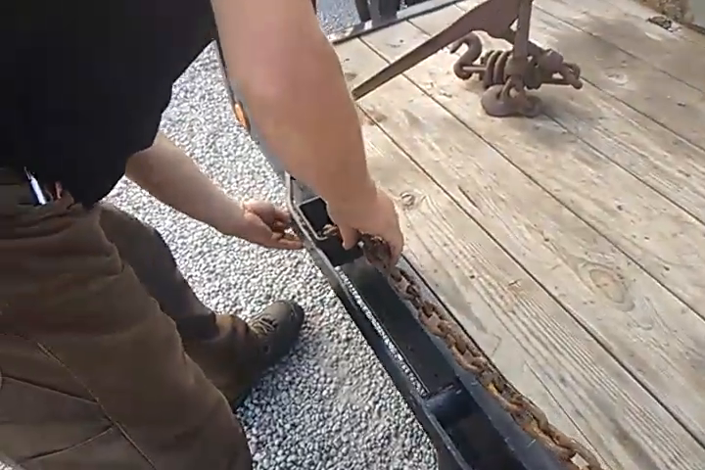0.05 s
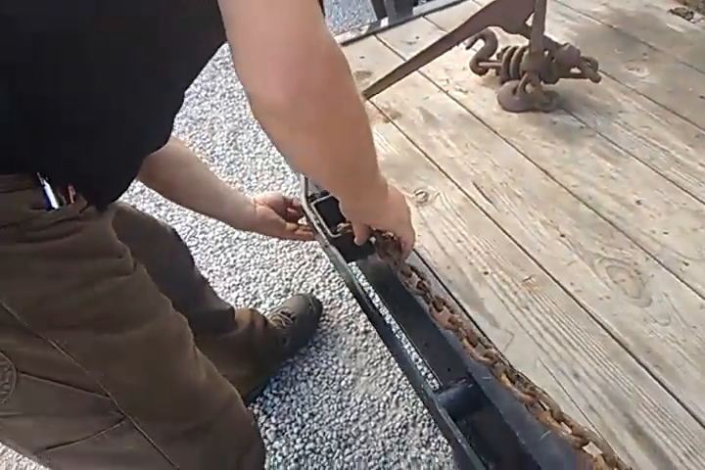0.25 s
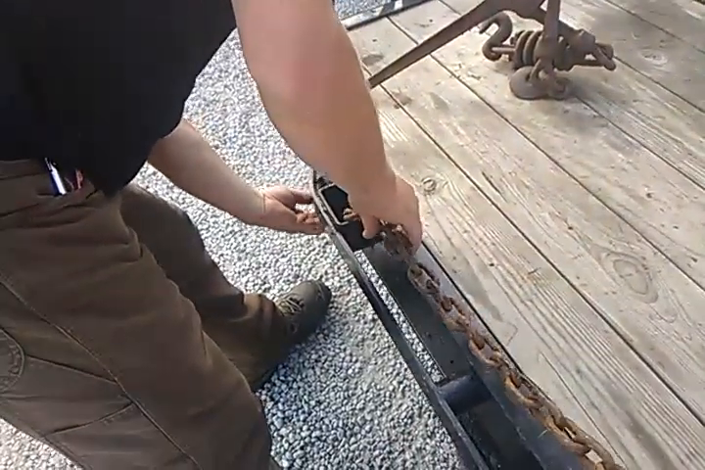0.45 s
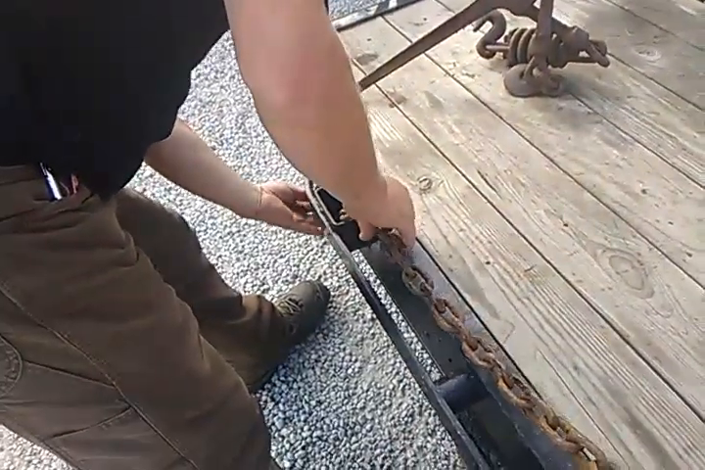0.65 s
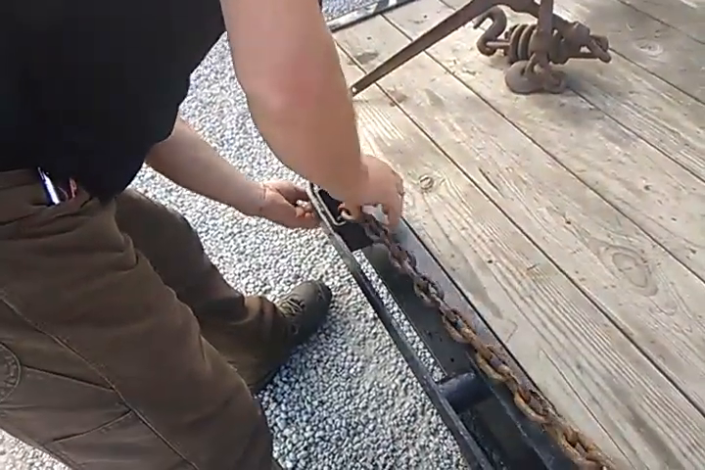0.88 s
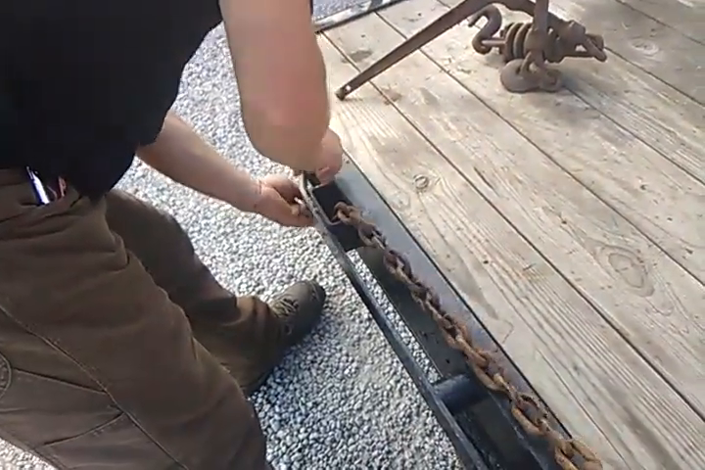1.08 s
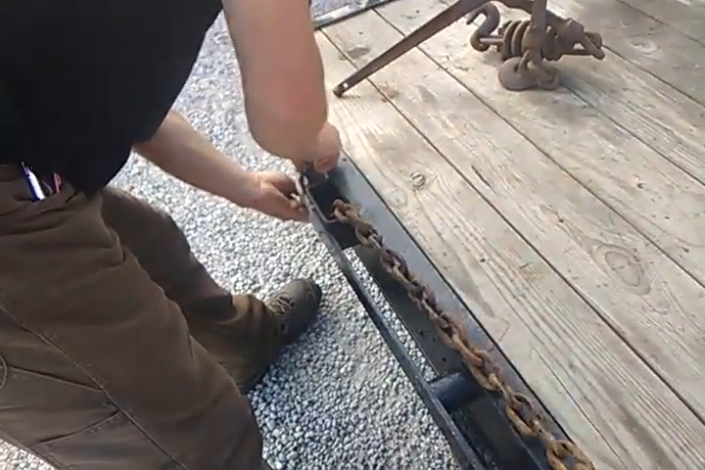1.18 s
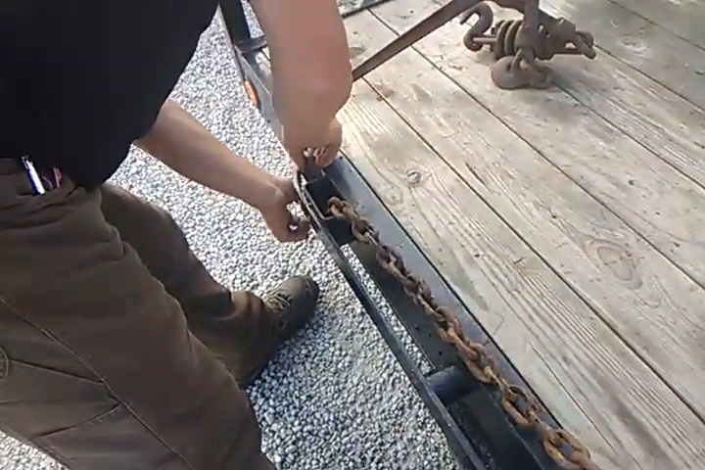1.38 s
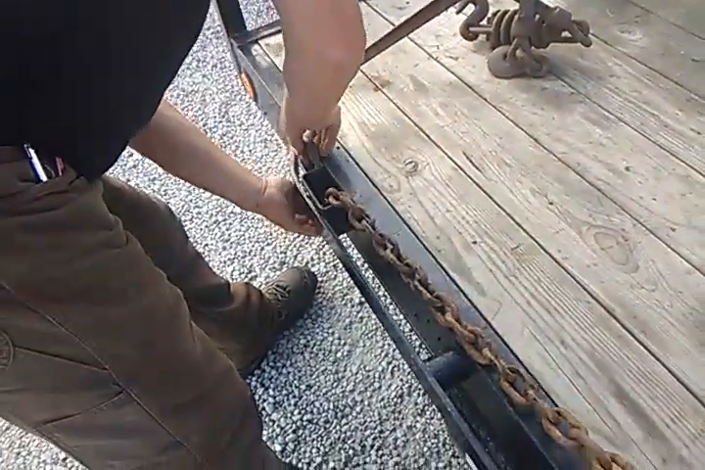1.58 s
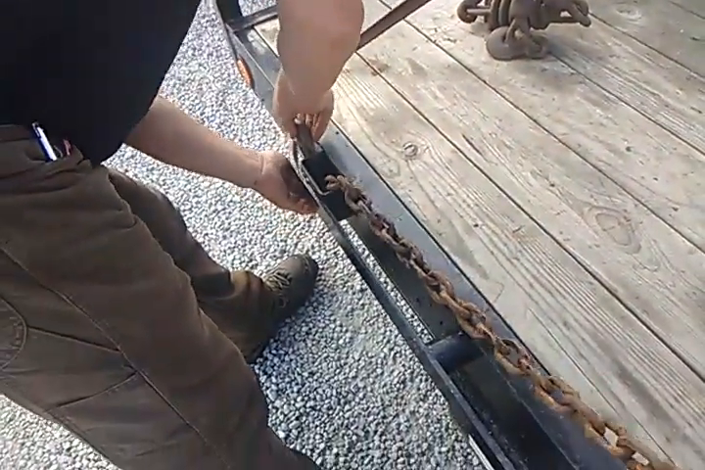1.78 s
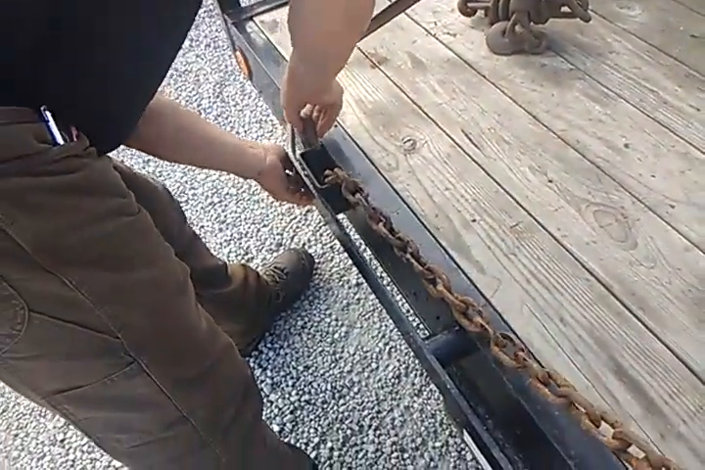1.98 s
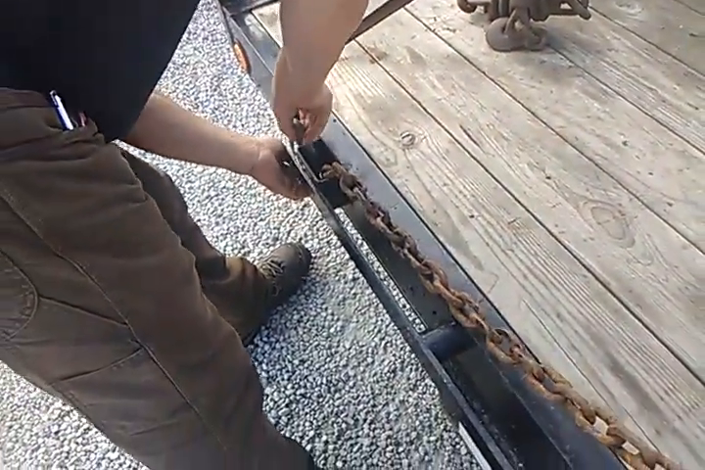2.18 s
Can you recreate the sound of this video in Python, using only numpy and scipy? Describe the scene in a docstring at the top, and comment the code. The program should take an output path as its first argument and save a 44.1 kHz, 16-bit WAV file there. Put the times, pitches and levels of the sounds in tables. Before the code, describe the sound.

A heavy steel chain rattles and clanks over a metal trailer rail outdoors, ringing brightly, then settling

```python
"""A heavy steel chain is hauled link by link over the rail of a trailer, outdoors, before two microphones.
Each blow is a run of contacts that shakes noise bands and modes of the rail, plus a clink and inharmonic partials.
Snaps are bright noise bursts, slipping links squeak as gliding sines, free links ring on in high modes.
The loose end then knocks a few times and the deck thuds in dull noise.
Behind it, low noise is wind on the microphones, a steady hiss is the air, and falling sines are a faint bird."""
import sys
import numpy as np
from scipy import signal
from scipy.fft import rfft, irfft
from scipy.io import wavfile

SR = 44100
rng = np.random.default_rng(int(sys.argv[2]) if len(sys.argv) > 2 else 0)


def store_pcm(level_fs):
    """Save levels as 16-bit WAV."""
    pcm = np.round(np.clip(level_fs, -1, 1) * 32767).astype(np.int16)
    wavfile.write(sys.argv[1], SR, np.atleast_2d(pcm).T)


N = 99225
T = np.arange(N) / SR
HZ = np.maximum(np.fft.rfftfreq(N, 1 / SR), 1)
BASS_HZ, MIDDLE_HZ, TREBLE_HZ = 470, 2165, 8950  # where the tilts of a blow are read
LEFT_LEADS_S = .000095  # sound reaches the left microphone first


def from_db(db):
    """Decibels to gain."""
    return 10 ** (np.asarray(db) / 20)


def rms_one(x):
    """Scale to unit level."""
    return x / np.sqrt(np.mean(x ** 2) + 1e-20)


def at_hz(points, hz, axis=1):
    """Read a column of a table on a log-frequency axis."""
    p = np.array(points)
    return np.interp(np.log(hz), np.log(p[:, 0]), p[:, axis])


def at_time(points):
    """Read a table of levels along the whole scene."""
    return np.interp(T, *np.transpose(points))


def treble_share(hz):
    """Share of a blow's treble tilt that applies at a frequency."""
    return at_hz([(MIDDLE_HZ, 0), (TREBLE_HZ, 1)], hz)


def fade(t, t60):
    """Ring-down from t = 0, by 60 dB in t60 seconds."""
    return np.exp(-np.log(1000) * np.maximum(t, 0) / t60)


def pan(db):
    """Left and right gains of equal total power; positive is left."""
    g = from_db(np.array([[.5], [-.5]]) * db)
    return g / np.sqrt(np.mean(g ** 2, axis=0))


def lags():
    """Arrival delay at the left and right microphone."""
    return np.array([[0], [1]]) * LEFT_LEADS_S


def drift(hz):
    """Chance wandering, mostly below the given frequency, spread 1."""
    return rms_one(irfft(rfft(rng.standard_normal(N)) / (1 + (HZ / hz) ** 2), N))


# how alike the two microphones hear noise: pitch_hz, correlation
LIKENESS_BY_PITCH = [(60, 0.036), (140, 0.18), (280, 0.81), (600, 0.71), (2000, 0.42), (9000, 0.097)]


def noise(gain):
    """Stereo noise of a given colour as the two microphones hear it, unit level."""
    left, other = rfft(rng.standard_normal((2, N)))
    alike = np.clip(at_hz(LIKENESS_BY_PITCH, HZ), 0, 1)
    right = alike * left + np.sqrt(1 - alike * alike) * other
    right = right * np.exp(-2j * np.pi * HZ * LEFT_LEADS_S)
    return rms_one(irfft(np.array([left, right]) * gain, N))


def coloured(colour):
    """Unit-level stereo noise with the spectrum of a colour table."""
    return noise(from_db(at_hz(colour, HZ)))


# colour of the wind: pitch_hz, density_db (per Hz, relative)
WIND_COLOUR = [(20, -35), (35, -6.5), (52, 6), (75, 2.5), (110, -1), (170, -14.5), (300, -35.5), (800, -70)]
# rise and fall of the wind: time_s, level_db (relative)
WIND_LEVELS = [(0.0, -30), (0.06, -25.5), (0.09, -46), (0.12, -34), (0.14, -32.5), (0.41, -25.5),
               (0.43, -35.5), (0.51, -33), (0.56, -36), (0.76, -30), (0.83, -42), (1.11, -33.5),
               (1.18, -41), (1.28, -35.5), (1.31, -44.5), (1.82, -53), (2.2, -51), (2.25, -36)]
WIND_DB = 4


def wind():
    """Wind rumbles on the microphones as deep noise of changing level."""
    return from_db(at_time(WIND_LEVELS) + WIND_DB) * coloured(WIND_COLOUR)


# puffs of wind buffet the microphones: middle_s, level_db, spread_s (standard deviation)
WIND_PUFFS = [(.115, -21, .011), (0.188, -26, 0.0085), (0.255, -24.5, 0.017), (0.3, -20, .0085),
              (0.332, -25.5, 0.015), (0.404, -29, 0.0064), (0.5, -27, 0.028), (0.54, -19, 0.0042),
              (1.086, -40, 0.0087)]
# colour of a puff: pitch_hz, density_db (per Hz, relative)
PUFF_COLOUR = [(50, 3.5), (110, 3), (160, 5.5), (250, -9), (400, -27), (900, -63)]


def puffs():
    """Short bell-shaped swells of low noise as puffs buffet the microphones."""
    level = sum(from_db(db) * np.exp(-.5 * ((T - s) / spread) ** 2) for s, db, spread in WIND_PUFFS)
    return level * coloured(PUFF_COLOUR)


# colour of the hiss: pitch_hz, density_db (per Hz, relative)
AIR_COLOUR = [(100, -25), (500, 1.5), (1000, -2.5), (2000, -2), (3600, -9.5), (6000, -5.5), (9300, -1.5),
              (11500, -17.5), (14000, -16)]
# slow changes of the hiss: time_s, level_db (relative)
AIR_LEVELS = [(0, 13.5), (.2, -2), (.6, 4), (1.2, -2), (1.42, -2.5), (1.58, 1.5), (1.75, 6), (1.9, 7),
              (2.08, -0.5), (2.25, -3)]
AIR_DB, AIR_WAVER_DB, AIR_WAVER_HZ = -52, 1.2, 14


def air():
    """A quiet hiss of broad noise, slightly wavering."""
    level_db = AIR_DB + at_time(AIR_LEVELS) + AIR_WAVER_DB * drift(AIR_WAVER_HZ)
    return from_db(level_db) * coloured(AIR_COLOUR)


# chirps of a small bird: start_s, level_db
BIRD_CHIRPS = [(1.053, -36.5), (1.112, -40.5), (1.168, -45.5), (1.228, -51)]
CHIRP_START_HZ, CHIRP_FALL_HZ_PER_S, CHIRP_S = 7600, 110000, .026
ECHO_S, ECHO_DB = .011, -9
CHIRP_ROUGH_RAD = .6


def bird():
    """Thin falling chirps, each with one echo, blurred by distance."""
    out = np.zeros(N)
    echoes = [(s + ECHO_S, db + ECHO_DB) for s, db in BIRD_CHIRPS]
    for s, db in BIRD_CHIRPS + echoes:
        t = np.clip(T - s, 0, CHIRP_S)
        phase = 2 * np.pi * (CHIRP_START_HZ - CHIRP_FALL_HZ_PER_S * t / 2) * t
        phase = phase + CHIRP_ROUGH_RAD * drift(670)
        out += from_db(db) * np.sin(np.pi * t / CHIRP_S) ** 2 * np.sin(phase)
    return out


# dull thuds of the deck: start_s, level_db, decay_after_s
DECK_THUDS = [(.384, -51, .007), (1.098, -41.5, 0.047), (1.678, -37.5, 0.042), (1.75, -41.5, 0.035),
              (1.916, -19.5, 0.0082), (1.988, -38, 0.014), (2.081, -34.5, 0.034), (2.162, -43, 0.027),
              (2.224, -34.5, .015)]
# colour of the planks: pitch_hz, density_db (per Hz, relative)
DECK_COLOUR = [(60, -35), (130, -12), (220, 10), (330, 6), (500, 6.5), (750, -5), (1500, -26.5),
               (4000, -65)]
DECK_T60_S = 0.14


def deck(attack_s=0.016):
    """The chain's weight shifts on the planks: noise with a soft onset, short hold and dull decay."""
    level = sum(from_db(db) * np.clip((T - s) / attack_s, 0, 1) * fade(T - s - decay_after, DECK_T60_S)
                for s, db, decay_after in DECK_THUDS)
    return level * coloured(DECK_COLOUR)


# a link slips and squeaks: start_s, length_s, level_db, fall_hz (negative rises)
LINK_SQUEAKS = [(.003, 0.0049, -34, 0), (0.092, .013, -40, 2), (0.19, .007, -34.5, 600),
                (0.219, 0.0063, -30, 698), (.487, .011, -34, 399), (0.699, 0.014, -16.5, -12),
                (0.74, 0.019, -15, 398), (0.81, 0.0047, -15, 3), (.815, 0.032, -17, 2),
                (0.857, 0.016, -20, 0), (1.229, 0.0035, -47.5, 5)]
SQUEAK_HZ, SQUEAK_JITTER_HZ, SQUEAK_ROUGH, SQUEAK_PAN_DB = 5100, 165, .45, -12.5


def squeaks():
    """Steel sticks and slips on steel: a short whistle, rough in pitch and level."""
    out = np.zeros(N)
    jitter = SQUEAK_JITTER_HZ * drift(650)
    rough = 1 + SQUEAK_ROUGH * drift(300)
    for s, length, db, fall_hz in LINK_SQUEAKS:
        on = (T > s) & (T < s + length)
        progress = (T[on] - s) / length
        hz = SQUEAK_HZ + jitter[on] - fall_hz * (progress - .5)
        phase = 2 * np.pi * np.cumsum(hz) / SR
        out[on] += from_db(db) * np.sqrt(2 * np.sin(np.pi * progress)) * np.sin(phase)
    return pan(SQUEAK_PAN_DB) * out * rough


RING_WAVER_HZ, RING_FLICKER_DB = 24, 3.8


def link_tone(hz):
    """One mode of a link, wavering as it rubs on its neighbours."""
    phase = 2 * np.pi * (np.cumsum(hz + RING_WAVER_HZ * drift(140)) / SR - hz * lags())
    return np.sin(phase) * from_db(RING_FLICKER_DB * drift(73.0))


# modes of four links, by link name: pitch_hz, level_db (relative), t60_s
LINK_RING_MODES = {"a": [(13848, 0, .1), (10115, -11, .14), (12650, -19, .12), (13130, -14, .08)],
                   "b": [(13125, 0, .14), (11740, -13, .13), (12670, -15, .11)], "c": [(6750, 0, .25),
                   (9000, -8, .08)], "d": [(13090, 0, .07), (13680, -2, .045), (14200, -4, .05)]}
# a link rings free: start_s, link, level_db (relative), swell_s, left_right_db
LINK_RINGS = [(.192, "c", -48, .002, -26), (0.241, "c", -32.5, .001, -30), (.455, "b", -43, 0.0099, 0),
              (.48, "d", -42, 0.013, -13), (0.49, "b", -34.5, 0.0035, 2), (.667, "c", -22, 0.0035, -14),
              (0.668, "a", -15, 0.025, 3), (0.738, "a", -21.5, 0.0018, 13), (.74, "d", -18, 0.0027, 0),
              (0.816, "a", -5.5, 0.013, 10), (0.856, "b", -17, 0.0021, 2), (.928, "b", -30, .003, 1),
              (.953, "d", -27, .003, 2), (.962, "d", -22, 0.0033, 2), (1.1, "b", -53, .002, -3)]


def links():
    """A rubbed link swells into its high modes, then rings down."""
    tones = {name: [link_tone(hz) for hz, _, _ in modes] for name, modes in LINK_RING_MODES.items()}
    out = np.zeros((2, N))
    for s, name, db, swell_s, side in LINK_RINGS:
        swell = np.clip((T - s) / swell_s, 0, 1)
        ring = sum(from_db(db + mode_db) * fade(T - s - swell_s, t60) * tone
                   for (_, mode_db, t60), tone in zip(LINK_RING_MODES[name], tones[name]))
        out += pan(side) * swell * ring * np.sqrt(2)  # a sine to unit level
    return out


# dry snaps as one link jerks against the next: start_s, level_db
LINK_SNAPS = [(.065, -38), (.193, -45), (0.217, -35), (0.243, -21), (0.4125, -34), (.7428, -8.5),
              (0.818, -9), (.929, -13), (.963, -21), (1.084, -36), (1.1, -39), (1.613, -26), (1.789, -24),
              (1.9165, -15.5)]
# colour of a snap: pitch_hz, density_db (per Hz, relative)
SNAP_COLOUR = [(1500, -22), (4000, -20), (6100, 2.5), (7200, -1), (8200, -1), (10000, -7), (11500, -18),
               (14000, -27)]
SNAP_T60_S, SNAP_PAN_DB = 0.029, -2.5


def snaps():
    """Links jerk taut: bright noise starts at once and dies within hundredths of a second."""
    level = sum(from_db(db) * (T >= s) * fade(T - s, SNAP_T60_S) for s, db in LINK_SNAPS)
    return pan(SNAP_PAN_DB) * level * coloured(SNAP_COLOUR)


# links strike the rail; jingle, clinks and contacts all play these blows:
# start_s, level_db (relative), bass_db, treble_db, chatter_s, left_right_db, pitch_hz
BLOWS = [(.001, -41, 9, -7, 0.034, -7, 2080), (0.068, -30.5, -8, -9.5, 0.018, -5.5, 2063),
         (0.2425, -17, -9.5, -19, 0.015, -4, 2035), (.347, -14, 3.5, -8.5, 0.0089, -3, 1413),
         (0.413, -21, -30, -3, 0.011, -8, 6090), (0.452, -14.5, -6, -10, 0.011, -4.5, 2080),
         (0.489, -52.5, -2, 30, 0.0048, -10, 4900), (.667, -9, -12, -1, 0.013, -2.5, 8920),
         (0.684, -13.5, -1.5, -1.5, 0.029, -5, 1403), (0.739, -23.5, -17, 10, 0.0042, -3, 7480),
         (0.757, -20, -1, -17, 0.013, -1.5, 1498), (0.816, -18.5, 3, 4.5, 0.021, -1.5, 10100),
         (0.863, -30.5, 11, 5.5, 0.011, -10, 6800), (0.8958, -11.5, -9, -2.5, 0.017, -5, 2040),
         (0.9273, -15, 3.5, 6, 0.0035, -6, 7830), (0.94, -18.5, 1.5, -4, 0.022, -3, 3190),
         (0.961, -17.5, -13, 4.5, 0.0066, -4, 9090), (1.04, -39.5, 16, -6, 0.025, -5, 1178),
         (1.084, -33, 7, -29, 0.0022, -5.5, 2630), (1.099, -51.5, 5.5, 17.5, 0.0033, -23, 5000),
         (1.115, -38, 10, -62, 0.007, -4.5, 1436), (1.23, -51.5, 19, -38, 0.0062, -5, 1480),
         (1.275, -55, 15.5, 4, .003, -12, 6500), (1.3031, -26, -7, -9, 0.0069, -7.5, 2034),
         (1.314, -36.5, 1.5, -26, 0.0028, 11, 2100), (1.437, -50, -4, -17, 0.0028, -7, 2050),
         (1.475, -32, -47, 9.5, 0.0039, -5.5, 7800), (1.607, -39.5, -5, 4.5, 0.0017, -16, 7000),
         (1.6134, -22.5, -3.5, -2.5, .004, -5.5, 1990), (1.621, -30.5, 5.5, -15, 0.0079, 0, 1500),
         (1.711, -43, 7, -6.5, 0.0038, -13, 2670), (1.79, -30, 2.5, -35, 0.0081, -3.5, 1502),
         (1.824, -35.5, -8, -3.5, 0.0053, -6, 1460), (1.91, -28.5, 4, -12, 0.014, -1, 1520),
         (1.922, -34, 8.5, -5.5, 0.029, -5, 817), (2.017, -49, 19, -32, 0.0027, -3, 1270)]
JINGLE_LOW_HZ, JINGLE_HIGH_HZ, JINGLE_T60_S, JINGLE_DB = 1250, 10200, .09, -11


def jingle(count=7):
    """Every blow sets another link ringing with its own inharmonic partials."""
    out = np.zeros((2, N))
    for s, db, _, treble, _, side, _ in BLOWS:
        on = slice(max(int(s * SR), 0), int((s + 2 * JINGLE_T60_S) * SR))
        t = np.maximum(T[on] - s, 0)
        for k, (place, turn) in enumerate(rng.random((count, 2))):
            hz = JINGLE_LOW_HZ * (JINGLE_HIGH_HZ / JINGLE_LOW_HZ) ** ((k + place) / count)
            level = from_db(db + JINGLE_DB + treble * treble_share(hz))
            cycles = hz * t + turn * np.array([[0], [.5]])  # phase differs left to right
            out[:, on] += pan(side) * level * fade(t, JINGLE_T60_S) * np.sin(2 * np.pi * cycles)
    return out


CLINK_DB, CLINK_HALF_WIDTH_HZ, CLINK_T60_S = -4, 52, 0.052


def clinks():
    """Each blow also rings briefly, as narrow noise at a pitch set by where its link lands."""
    out = np.zeros((2, N))
    wander = signal.hilbert(noise(1 / (1 + (HZ / CLINK_HALF_WIDTH_HZ) ** 2)))
    for s, db, _, treble, chatter_s, side, hz in BLOWS:
        on = slice(max(int(s * SR), 0), int((s + .3) * SR))
        level = from_db(db + CLINK_DB + treble * treble_share(hz))
        carrier = np.exp(2j * np.pi * hz * (T[on] - lags()))
        tone = np.real(wander[:, on] * carrier)
        out[:, on] += pan(side) * level * fade(T[on] - s - chatter_s, CLINK_T60_S) * tone
    return out


CHATTER_PER_S, CHATTER_DB, CHATTER_SPREAD_DB = 260, -7.5, 3.5


def contacts(count=24):
    """Each blow is a first contact and a run of uneven rebounds: start, level, bass, treble, pan."""
    rows = []
    for s, db, bass, treble, chatter_s, side, _ in BLOWS:
        delays = (np.arange(count) + rng.uniform(0.5, 1.3, count)) / CHATTER_PER_S
        sizes, sides = rng.standard_normal((2, count))
        rows.append((s, db, bass, treble, side))
        for delay, size, sideways in zip(delays, sizes, sides):
            if delay < chatter_s:
                rebound_db = db + CHATTER_DB + CHATTER_SPREAD_DB * np.clip(size, -2, 1)
                rows.append((s + delay, rebound_db, bass, treble, side + 2 * sideways))
    return np.transpose(rows)


def die_away(energy, t60):
    """Energy put into a body leaks away."""
    return signal.lfilter([1], [1, -np.exp(-2 * np.log(1000) / (t60 * SR))], energy + 1e-18)


def resonance(x, hz, width_hz):
    """One mode, gain 1 at its top."""
    r = np.exp(-np.pi * width_hz / SR)
    forward = np.array([1, 0, -1]) * (1 - r * r) / 2
    return signal.lfilter(forward, [1, -2 * r * np.cos(2 * np.pi * hz / SR), r * r], x)


# the rail's dense ring: pitch_hz, density_db (per Hz, relative), t60_s, long_tail_db (relative)
RAIL_RING = [(149, -13, 0.21, 0.5), (367, -4.5, 0.33, -16.5), (764, -2, 0.24, -15), (1530, -2, 0.12, -10.5),
             (2500, -0.5, 0.14, -26.5), (3600, -2.5, 0.15, -44.5), (6370, -2.5, 0.089, -15.5),
             (9500, -7, 0.15, -21), (11670, -10.5, 0.055, -26.5), (14140, -30, 0.069, -26)]
# its strongest modes: pitch_hz, width_hz, gain_db
RAIL_STRONG_MODES = [(207.8, 5, 9.5), (335, 3.8, 7), (498.7, 26, 0), (823, 24, -2.5), (1183, 37, -4.5),
                     (1304, 8.6, 4.5), (1529, 120, -1.5), (1763, 16, 2), (1993, 32, 5), (2106, 79, 3),
                     (2596, 46, 4), (2815, 22, 3.5), (4170, 27, -3.5), (4860, 31, 9), (5920, 14, -5.5),
                     (6640, 47, 6), (8770, 240, 11.5), (9200, 63, 7.5), (9930, 180, 2.5)]
RAIL_DB, TAIL_T60_S, CRACK_DB, CRACK_T60_S = -1.5, 0.34, -5.5, 0.022
RAIL_FLICKER_DB, RAIL_FLICKER_HZ = 1.5, 60
# softer contacts lose the very top: dB lost at TOP_HZ per dB below a hard contact
TOP_HZ, TOP_PER_DB, HARD_DB = 12800, 1.1, -4
BASS_PAN_DB = 5.5  # the trailer's body lies to the left


def rail():
    """Every contact gives a crack, a short dense ring and a faint long tail; the strongest modes ring on."""
    s, db, bass, treble, side = contacts()
    at = np.clip(s * SR, 0, N - 1).astype(int)
    edges_hz = [130, 260, 450, 700, 1200, 1700, 2300, 3200, 4400, 6000, 8200, 10400, 12500, 15000]
    out = np.zeros((2, N))
    for low, high in zip(edges_hz, edges_hz[1:]):
        hz = np.sqrt(low * high)
        colour = bass * at_hz([(BASS_HZ, 1), (MIDDLE_HZ, 0)], hz) + treble * treble_share(hz)
        if hz > TREBLE_HZ:
            colour = colour + (hz / TOP_HZ) ** 2 * TOP_PER_DB * np.minimum(db - HARD_DB, 0)
        sideways = pan(side + BASS_PAN_DB * (hz < BASS_HZ * 2))
        energies = (sideways * from_db(db + colour)) ** 2
        energy = np.array([np.bincount(at, e, N) for e in energies])
        ring = die_away(energy, at_hz(RAIL_RING, hz, axis=2))
        crack = from_db(CRACK_DB) ** 2 * die_away(energy, CRACK_T60_S)
        tail = from_db(at_hz(RAIL_RING, hz, axis=3)) ** 2 * die_away(energy, TAIL_T60_S)
        level = np.sqrt((ring + crack + tail) * (high - low) / MIDDLE_HZ)
        flicker_db = RAIL_FLICKER_DB * drift(RAIL_FLICKER_HZ)
        gain = from_db(RAIL_DB + at_hz(RAIL_RING, hz) + flicker_db)
        out += gain * level * noise((HZ >= low) & (HZ < high))
    return out + sum(from_db(db) * resonance(out, hz, width) for hz, width, db in RAIL_STRONG_MODES)


def scene():
    """Surroundings, trailer and chain."""
    background = wind() + puffs() + air() + bird()
    chain = squeaks() + links() + snaps() + jingle() + clinks() + rail()
    return background + deck() + chain


LOW_CUT_HZ, CUTOFF_HZ = 30, 14400


def record(dry):
    """The deepest rumble is cut, the loudest peaks overload, and the top is cut."""
    low_cut = signal.butter(4, LOW_CUT_HZ, "high", fs=SR, output="sos")
    top_cut = signal.ellip(10, .2, 70, CUTOFF_HZ, fs=SR, output="sos")
    heard = signal.sosfilt(low_cut, dry)
    return signal.sosfilt(top_cut, np.clip(heard, -1, 1))


dry = scene()
out = record(dry)
store_pcm(out)
```